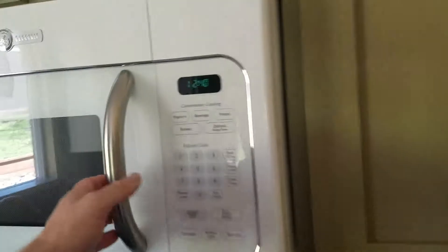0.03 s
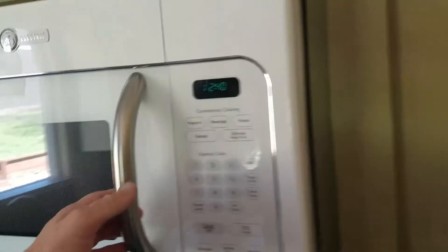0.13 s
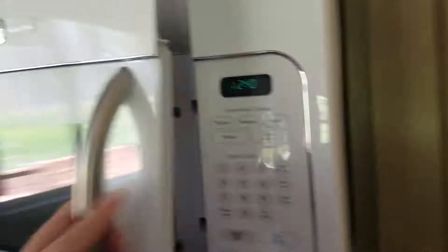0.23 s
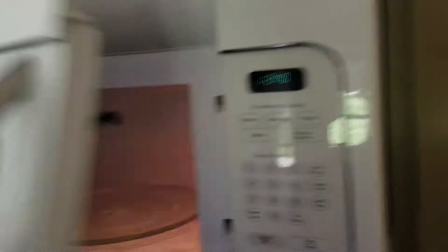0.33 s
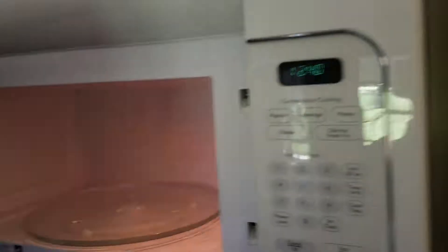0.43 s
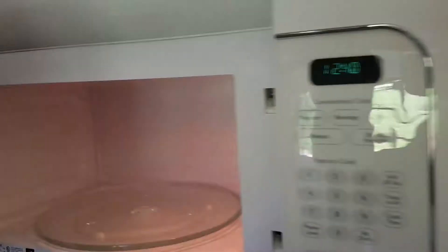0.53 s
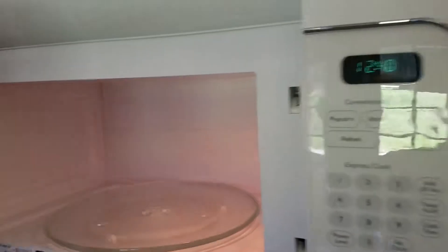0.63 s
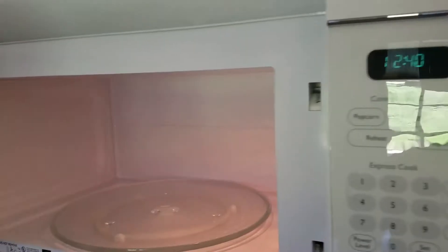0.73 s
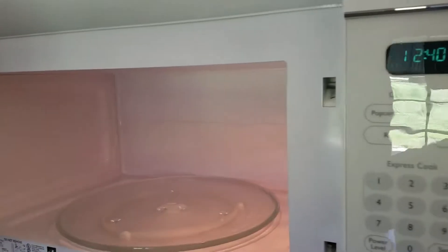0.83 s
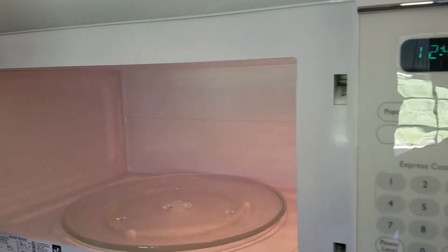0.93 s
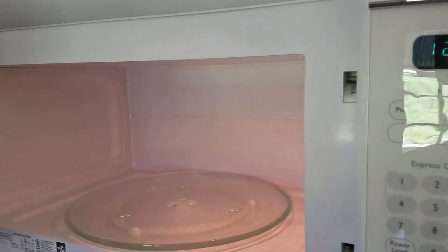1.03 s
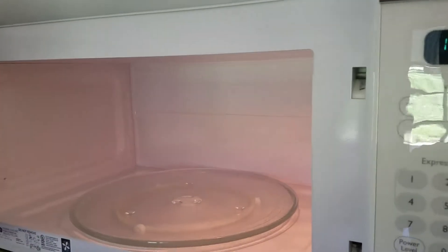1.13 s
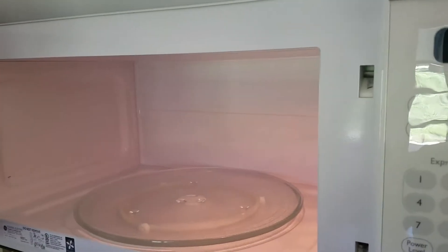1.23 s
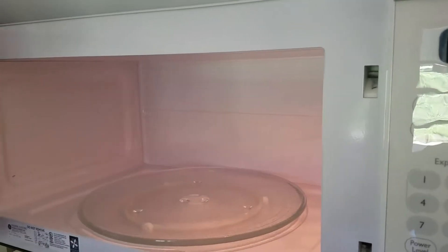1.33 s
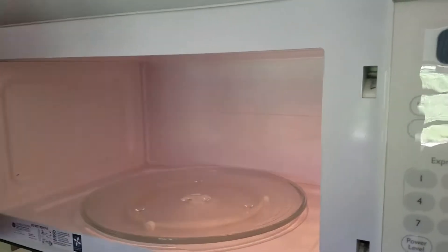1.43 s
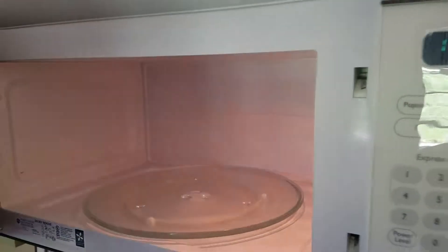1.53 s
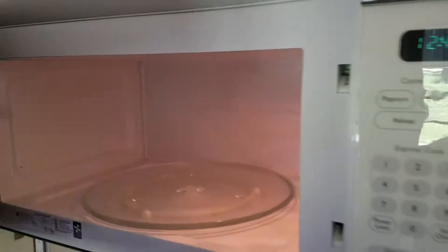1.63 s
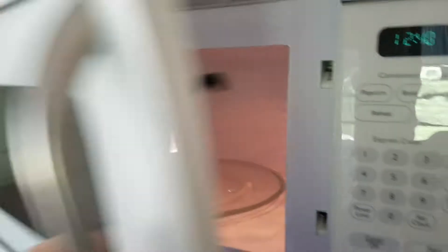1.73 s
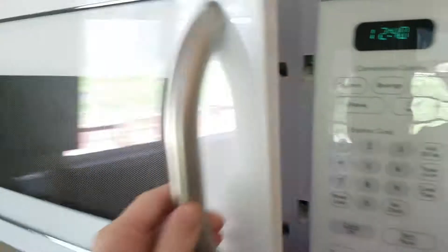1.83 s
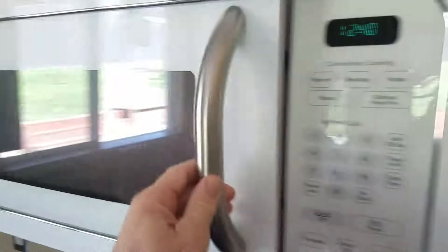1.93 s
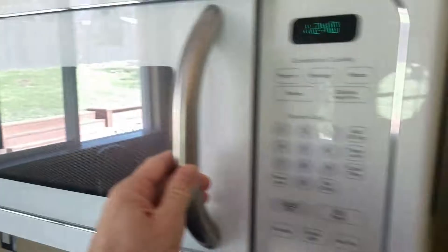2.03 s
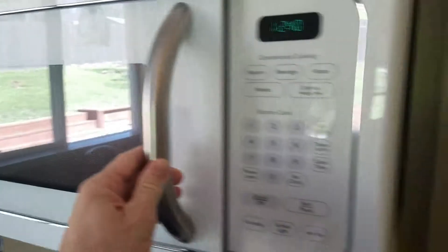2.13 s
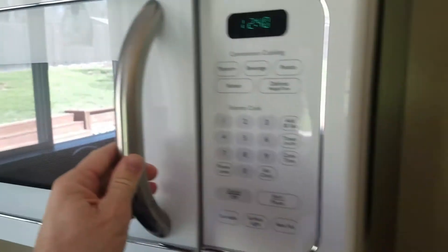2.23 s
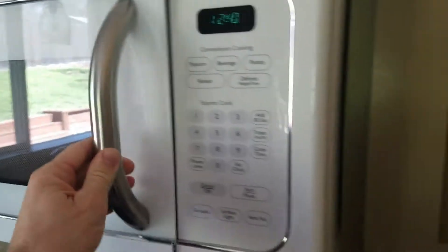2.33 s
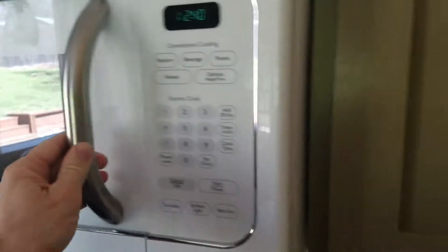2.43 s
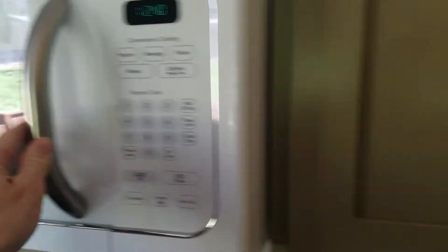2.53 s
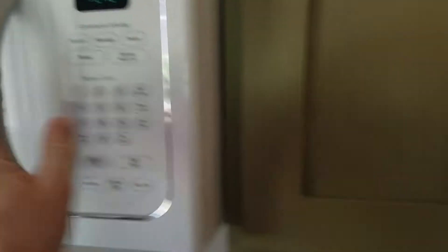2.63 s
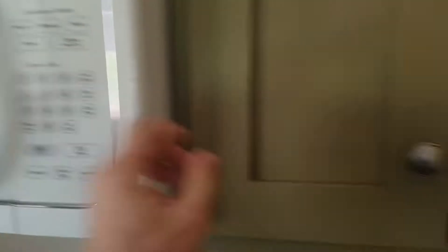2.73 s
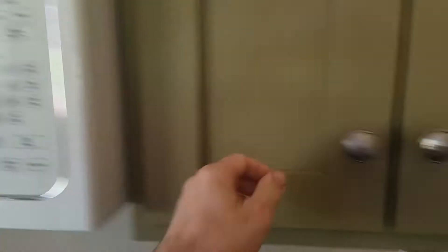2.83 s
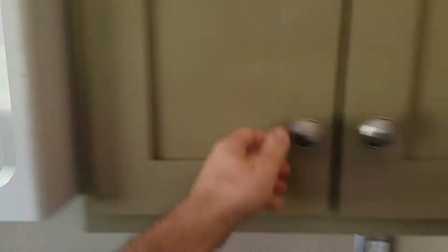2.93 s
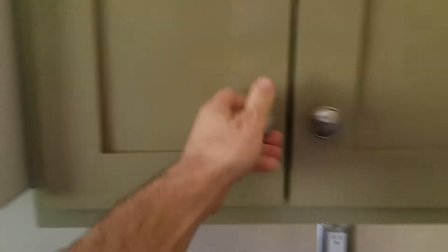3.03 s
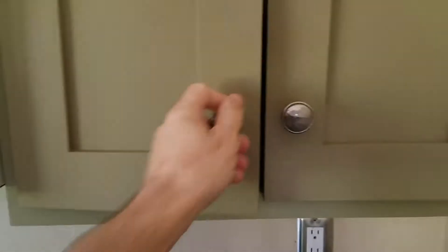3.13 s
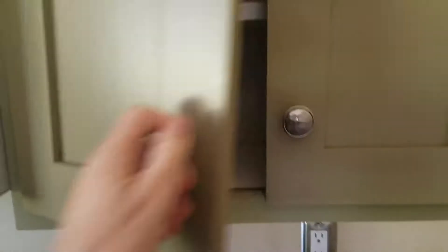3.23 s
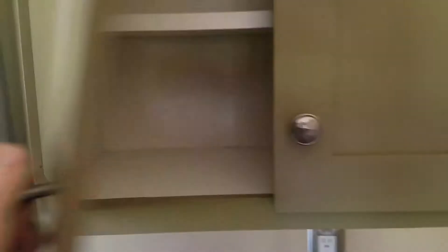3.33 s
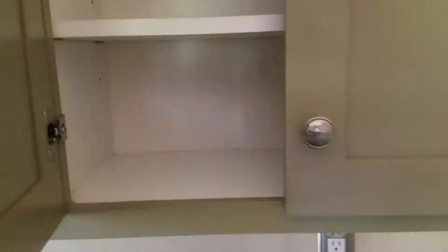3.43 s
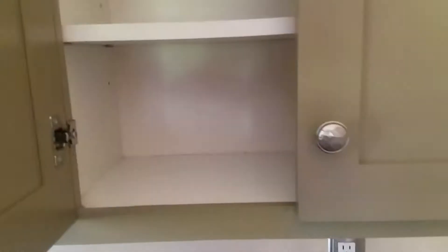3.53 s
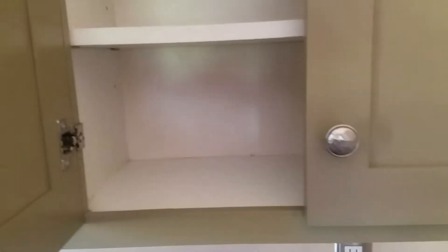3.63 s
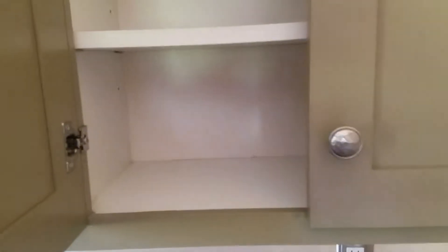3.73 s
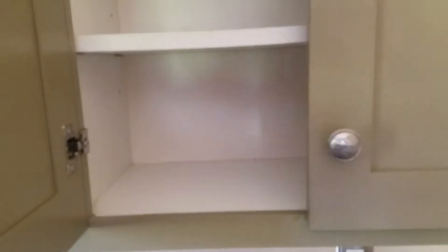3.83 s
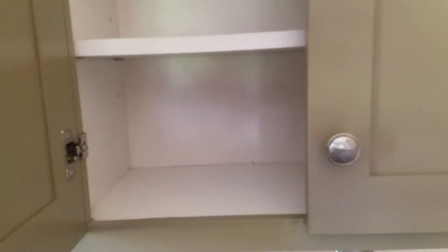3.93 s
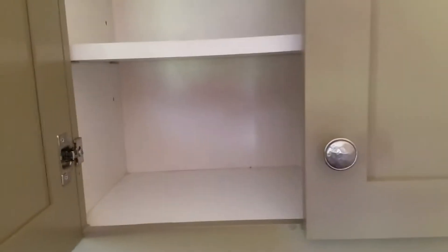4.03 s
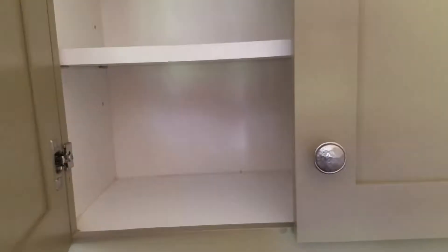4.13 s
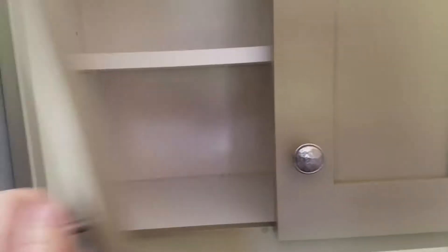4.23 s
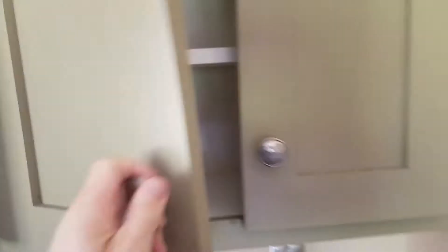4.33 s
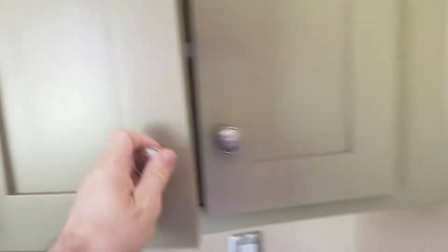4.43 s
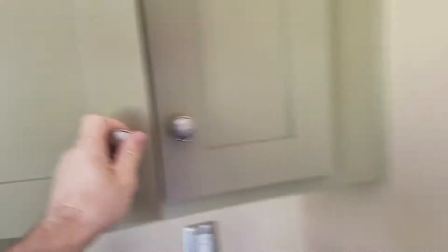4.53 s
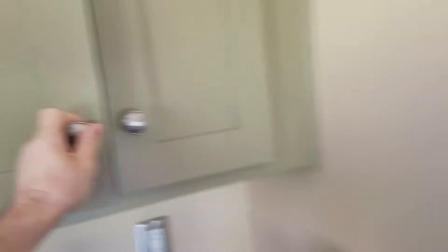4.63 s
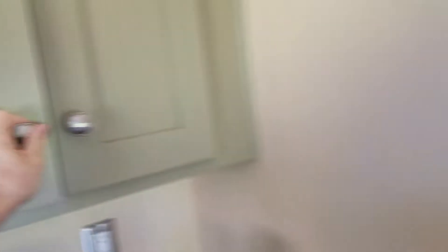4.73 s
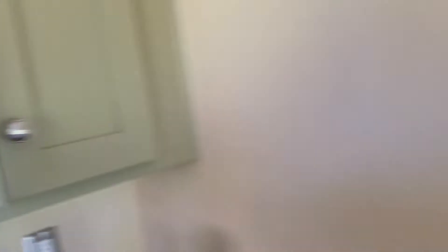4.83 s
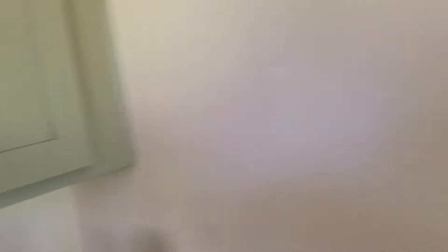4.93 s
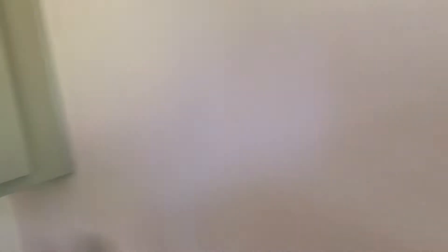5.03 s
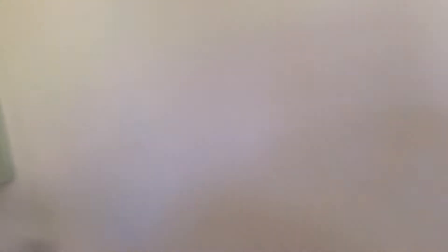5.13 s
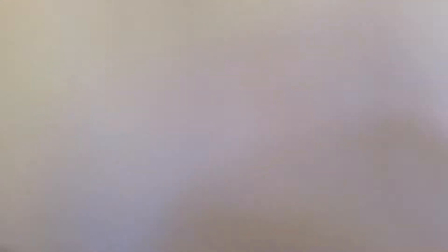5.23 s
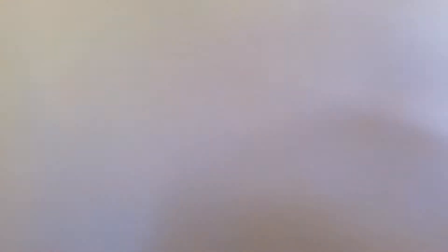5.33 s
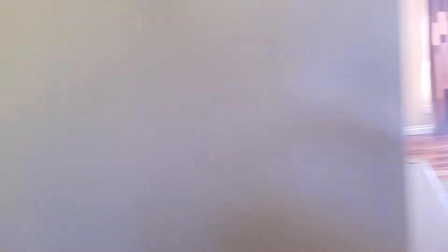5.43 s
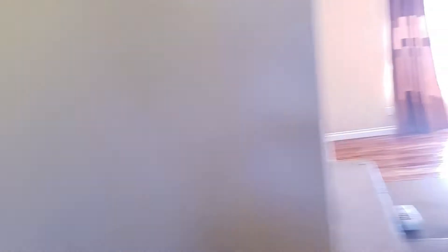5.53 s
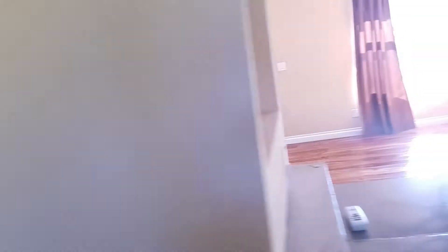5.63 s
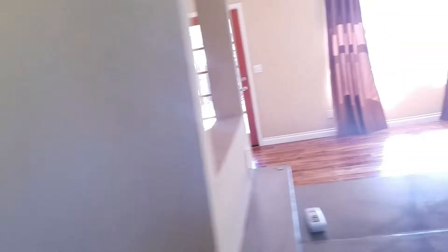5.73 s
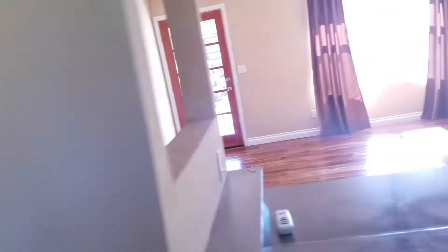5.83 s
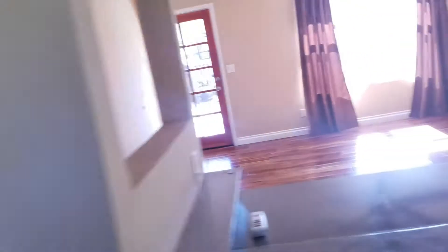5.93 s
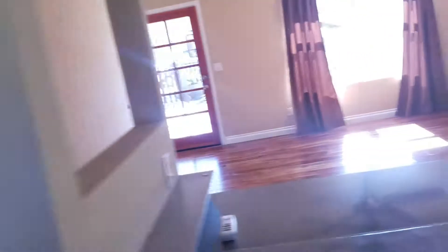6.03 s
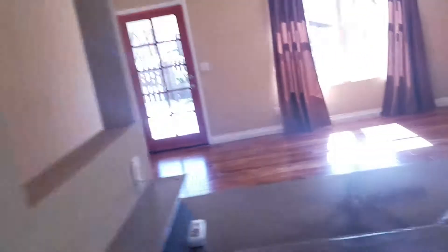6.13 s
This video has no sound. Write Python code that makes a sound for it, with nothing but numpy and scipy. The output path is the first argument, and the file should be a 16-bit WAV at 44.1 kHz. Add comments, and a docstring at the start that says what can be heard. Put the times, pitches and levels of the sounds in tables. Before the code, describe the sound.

A microwave door snaps open and slams shut, then a wooden cabinet door squeaks open and bangs closed in an echoing kitchen.

```python
"""A microwave door is pulled open with a snap and a humming spring, then pushed back until it latches.
A wooden cabinet door is opened, swung back and let go: it bangs and bounces to rest. Last comes one
hollow knock. Each blow is a short crack plus fading tones; rubbing is a fast run of tiny slips.
The bare kitchen of an empty house rings after every blow, heard by two microphones close by."""
import sys
import numpy as np
from scipy import signal
from scipy.fft import rfft, irfft, next_fast_len
from scipy.io import wavfile
from scipy.ndimage import uniform_filter1d

SR = 44100
rng = np.random.default_rng(int(sys.argv[2]) if len(sys.argv) > 2 else 0)


def log_audio(samples):
    """Write samples as a 16-bit WAV file to the path given in sys.argv[1]."""
    # one column per channel
    frames = np.atleast_2d(samples).T
    # limit to full scale, then quantise
    limited = np.clip(frames, -1, 1)
    pcm = np.round(limited * 32767).astype(np.int16)
    wavfile.write(sys.argv[1], SR, pcm)


N = 272484
BAND_HZ = np.geomspace(40, 16000, 18)


def amp(db):
    """Turns decibels into a gain."""
    return 10 ** (np.asarray(db) / 20)


def unit_power(x):
    """Scales a sound to an average power of 1."""
    return x / np.sqrt(np.mean(x ** 2) + 1e-20)


def read(points, hz):
    """A table's value at the frequency hz."""
    f, value = np.transpose(points)
    return np.interp(np.log(hz + 1), np.log(f + 1), value)


def add(mix, s, sound):
    """Mixes a sound in, starting at s seconds."""
    part = mix[:, round(s * SR):][:, :sound.shape[-1]]
    part += sound[..., :part.shape[1]]


def tinted(x, colour):
    """Filters a sound by a colour: a table of how strong each frequency is."""
    size = next_fast_len(x.shape[-1] + 4096)
    gain = amp(read(colour, np.fft.rfftfreq(size, 1 / SR)))
    return irfft(rfft(x, size) * gain, size)[..., :x.shape[-1]]


# how alike left and right are (frequency [Hz], likeness [0 to 1])
LIKENESS = [(100, 0.96), (300, 0.9), (550, .8), (900, 0.41), (1400, 0), (16000, 0)]
def stereo_noise(size):
    """White noise at two close microphones: alike in the bass, unrelated in the treble."""
    common, apart = rfft(rng.standard_normal((2, size)))
    angle = np.arccos(np.clip(read(LIKENESS, np.fft.rfftfreq(size, 1 / SR)), -1, 1)) / 2
    return irfft(np.array([common * np.cos(angle) + side * apart * np.sin(angle) for side in (1, -1)]), size)


def in_bands(x):
    """Splits a stereo sound into bands, low to high: bands x channels x samples."""
    hz = np.fft.rfftfreq(x.shape[-1], 1 / SR)
    shares = np.array([read(np.c_[BAND_HZ, one], hz) for one in np.eye(len(BAND_HZ))])
    return irfft(rfft(x) * shares[:, None], x.shape[-1])


def ringing(tones, t):
    """Pure tones, each fading by 60 dB over its ring time, t60."""
    return sum((-1) ** k * amp(db - 60 * t / t60) * np.sin(2 * np.pi * hz * t)
               for k, (hz, db, t60) in enumerate(tones))


def hardness(hz, bass_db, treble_db):
    """Gain of a blow at hz: a heavy push feeds the bass, a hard edge the treble."""
    return amp(bass_db / (1 + (hz / 480) ** 3) + treble_db / (1 + (3200 / hz) ** 2))


def struck(blows, colour, ring, crack_db, tones=(), tones_db=0, size=18000):
    """Each blow cracks, then rings a crowd of short tones (made of noise) and any strong ones given."""
    t, hz, out = np.arange(size) / SR, BAND_HZ[:, None], np.zeros((2, N))
    crowd = in_bands(unit_power(tinted(stereo_noise(3 * size), colour)))
    power = np.mean(crowd ** 2, axis=1)
    rise = 1 - np.exp(-t * hz * 2)  # low tones take longer to get going
    decay = rise * (amp(-60 * t / read(ring, hz)) + amp(crack_db) * np.exp(-t / 0.0063))
    weight = decay ** 2 / np.sum(decay ** 2, axis=1, keepdims=True)
    for s, db, bass_db, treble_db in blows:
        start = rng.integers(2 * size)
        part = slice(start, start + size)
        # each band takes its share of the energy
        share = np.sqrt(power.mean(1) / np.sum(power[:, part] * weight, axis=1))
        envelope = decay * share[:, None] * hardness(hz, bass_db, treble_db)
        blow = np.einsum("bct,bt->ct", crowd[..., part], envelope)
        for tone in tones:
            way = rng.choice([-1, 1])  # the spot that is hit decides which way a tone starts
            blow += amp(tones_db) * hardness(tone[0], bass_db, treble_db) * way * ringing([tone], t)
        add(out, s, amp(db) * blow)
    return out


def rubbing(stroke, colour, slips_per_s, spread_db):
    """Tiny slips of uneven size, following a stroke of (time [s], level [dB]) points."""
    s, db = np.transpose(stroke)
    size, out = 3 * SR, np.zeros((2, N))
    slipping = rng.random(size) < slips_per_s / SR
    slips = slipping * amp(spread_db * np.minimum(rng.exponential(1, size), 4))
    t = np.arange(s[0], s[-1], 1 / SR)
    grain = unit_power(tinted((stereo_noise(size) * slips)[:, :len(t)], colour))
    add(out, s[0], grain * amp(np.interp(t, s, db)))
    return out


def swells(peaks, colour, rise_s, fall_s, slips_per_s, spread_db):
    """Rubbing that swells to each peak and dies away."""
    strokes = [[(max(s - rise_s, 0), db - 18.5), (s, db), (s + fall_s, db - 22.5)] for s, db in peaks]
    return sum(rubbing(stroke, colour, slips_per_s, spread_db) for stroke in strokes)


# colour of the background hush (frequency [Hz], level [dB])
AIR_COLOUR = [(25, -15), (50, -5), (65, 3.5), (100, -4), (130, 2.5), (170, -7), (245, 1), (330, -8.5),
              (420, -4.5), (800, -10.5), (2000, -12.5), (4000, -20.5), (8000, -28.5), (13500, -19.5),
              (15800, -25)]
def air(level_db=-65.5):
    """A faint, steady rumble and hiss."""
    return amp(level_db) * unit_power(tinted(stereo_noise(N), AIR_COLOUR))


# how long the echo lasts (frequency [Hz], ring time [s])
ROOM_RING = [(80, 0.71), (300, 0.8), (600, 0.69), (1300, 1), (2700, 0.95), (5000, 0.88), (8000, .45),
             (15000, 0.93)]
# the echo compared with the direct sound (frequency [Hz], level [dB])
ROOM_LEVEL = [(80, -11.5), (300, -6), (700, -3), (1400, -3.5), (3000, -7), (6000, -6), (9000, -9.5),
              (15000, -14)]
def room(x, size=60000):
    """Bare walls throw back a dense echo that builds up quickly and fades in about a second."""
    t = np.arange(size) / SR
    decay = amp(-60 * t / read(ROOM_RING, BAND_HZ[:, None]))
    build_up = 1 - np.exp(-t / 0.0016)
    spectrum = rfft(np.einsum("bct,bt->ct", in_bands(stereo_noise(size)), decay) * build_up)
    spectrum /= np.sqrt(uniform_filter1d(abs(spectrum) ** 2, size=60, axis=1))  # share energy evenly
    tail = tinted(irfft(spectrum, size), ROOM_LEVEL) * np.minimum(1, 10 * (t[-1] - t))
    return signal.fftconvolve(x, tail, axes=1)[:, :N]


# drags of the hand (peak time [s], level [dB])
HAND_STROKES = [(3.0, -43.5), (3.11, -41), (3.36, -48), (4.16, -52), (4.62, -56), (4.95, -61.5)]
# colour of their rumble (frequency [Hz], level [dB])
HAND_COLOUR = [(40, -16), (75, -1.5), (140, 1), (270, -3.5), (420, -16.5), (620, -23.5), (900, -26),
               (2500, -34.5), (7000, -48.5), (15000, -44)]
def hand():
    """Skin dragging on the knob makes the door panel rumble, alike at both microphones."""
    return swells(HAND_STROKES, HAND_COLOUR, rise_s=.055, fall_s=.22, slips_per_s=6200, spread_db=3)[0]


def fumbles(count=6, start_s=4.38, end_s=5.0, db=-46, spread_db=9, cutoff_hz=115):
    """Faint bumps at loose intervals."""
    gap = (end_s - start_s) / count
    return [(start_s + (k + late) * gap, db + spread_db * (2 * force - 1), cutoff_hz)
            for k, (late, force) in enumerate(rng.random((count, 2)))]


# soft bumps of hand and doors (time [s], strength [dB], treble cutoff [Hz])
BUMPS = [(.01, -45, 90), (2.077, -21.5, 125), (2.988, -42, 155), (3.069, -30, 111), (3.087, -28.5, 310),
         (3.345, -34.5, 181), (3.425, -38, 84), (4.18, -45.5, 220.6)]
# a panel's low tones (frequency [Hz], level [dB], ring time [s])
BUMP_TONES = [(68.3, -1.5, 0.099), (101.3, 1.5, 0.095), (152.1, 9.5, 0.036), (241, -3.5, 0.2),
              (300, 2.5, 0.047)]
def bumps():
    """Soft contacts wake only the lowest tones of a panel, a little differently at each spot."""
    t, out = np.arange(SR // 3) / SR, np.zeros((2, N))
    for s, db, cutoff_hz in BUMPS + fumbles():
        tones = [(hz * (1 + 0.06 * rng.uniform(-1.1, 1)),
                  level - 10 * np.log10(1 + (hz / cutoff_hz) ** 6), t60) for hz, level, t60 in BUMP_TONES]
        add(out, s, amp(db) * ringing(tones, t) * (1 - np.exp(-t / 0.0032)))
    return out


# hinge noises (peak time [s], level [dB])
SQUEAKS = [(1.14, -64.5)]
SQUEALS = [(3.27, -58.5), (3.45, -63)]
RASPS = [(4.33, -55), (4.46, -59), (4.65, -57)]
# their colours (frequency [Hz], level [dB])
SQUEAK_COLOUR = [(1600, -31), (2000, -2.5), (2350, 1), (3000, -26)]
SQUEAL_COLOUR = [(500, 9), (2200, 6), (3600, -5), (4900, 1.5), (5800, -9), (8500, -20), (10600, -11),
                 (11200, -7), (12000, -11), (15500, -40)]
RASP_COLOUR = [(200, -2), (900, -0.5), (2500, -3), (5000, -13.5), (8000, -16.5), (15000, -16)]
def hinges():
    """The microwave's hinge squeaks once; the cabinet's squeal as it opens and rasp as it swings back."""
    squeak = swells(SQUEAKS, SQUEAK_COLOUR, rise_s=.02, fall_s=.05, slips_per_s=3000, spread_db=1)
    squeal = swells(SQUEALS, SQUEAL_COLOUR, rise_s=.12, fall_s=.22, slips_per_s=3200, spread_db=2)
    rasp = swells(RASPS, RASP_COLOUR, rise_s=.11, fall_s=.2, slips_per_s=6600, spread_db=-2.5)
    return squeak + squeal + rasp


# small ticks (time [s], strength [dB])
TICKS = [(1.876, -45.5), (1.945, -57), (2.001, -38.5), (2.418, -28), (3.087, -44), (5.23, -46)]
# their colour (frequency [Hz], level [dB])
TICK_COLOUR = [(300, -13.5), (2700, -8), (3600, 2.5), (4500, -7), (5400, -4), (7000, -8.5), (11000, -8.5),
               (15500, -1)]
# their fade (frequency [Hz], ring time [s])
TICK_RING = [(3000, 0.2), (15000, 0.065)]
def ticks():
    """Short, bright ticks of treble, most of them faint."""
    return struck([(s, db, 0, 0) for s, db in TICKS], TICK_COLOUR, TICK_RING, crack_db=-6, size=6000)


# the latch's scrape (time [s], level [dB])
LATCH_SLIDE = [(2.1, -51), (2.17, -50), (2.26, -41.5), (2.295, -54), (2.32, -41.5), (2.375, -34),
               (2.39, -61)]
# its colour (frequency [Hz], level [dB])
LATCH_COLOUR = [(150, -14), (400, -14.5), (1300, -18), (2200, -18), (3200, -32.5), (5000, -40.5),
                (8000, -50.5), (15000, -51.5)]
def latch_slide():
    """The latch hooks rub up their ramps as the microwave closes."""
    return rubbing(LATCH_SLIDE, LATCH_COLOUR, slips_per_s=4900, spread_db=-5.5)


# the door spring's low and high tones (frequency [Hz], level [dB], ring time [s])
SPRING_TONES = [(232, -32, 1.1), (335.8, -43.5, 4.5), (348, -26, .3)]
SPRING_OVERTONES = [(671.5, -33, 1.1), (1229, -32, .6)]
def spring(freed_s=.176, snap_s=.232, held_s=1.75, damping_db_per_s=45):
    """Plucked and jarred by the latch, the spring hums, then dies faster once the hand takes the door."""
    t, out = np.arange(3 * SR) / SR, np.zeros((2, N))
    damping = amp(-damping_db_per_s * np.maximum(t + freed_s - held_s, 0))
    add(out, freed_s, ringing(SPRING_TONES, t) * damping)
    add(out, snap_s, ringing(SPRING_OVERTONES, t))
    return out


# the knock and its rebound (time [s], strength [dB], extra bass [dB], extra treble [dB])
KNOCKS = [(6.0488, -31.5, 8.5, -8.5), (6.0543, -29.5, -1.5, 7)]
# its colour (frequency [Hz], level [dB])
KNOCK_COLOUR = [(100, -36.5), (240, -5), (400, 12), (600, 5), (900, 1), (1300, -6.5), (2300, -11),
                (4000, -24.5), (7000, -41), (15000, -47)]
# its fade (frequency [Hz], ring time [s])
KNOCK_RING = [(300, 0.097), (900, 0.094), (5000, 0.27)]
# its strong tones (frequency [Hz], level [dB], ring time [s])
KNOCK_TONES = [(590, 1, .03), (720, -2, .025), (870, 1, .022)]
def hollow_knock():
    """A knock on something too small to give bass."""
    knock = struck(KNOCKS, KNOCK_COLOUR, KNOCK_RING, crack_db=-25,
                   tones=KNOCK_TONES, tones_db=-1, size=6000)
    return signal.sosfilt(signal.butter(2, 190, "high", fs=SR, output="sos"), knock)


def bounces(bang_s, count=7, flight_s=.117, flight_kept=.78):
    """Each flight of the cabinet door is shorter than the last, each landing weaker and duller."""
    times = bang_s + np.cumsum(flight_s * flight_kept ** np.arange(count))
    # (strength [dB], extra bass [dB], extra treble [dB])
    first, step = np.array([-23.5, 1.8, -5]), np.array([-3.5, 0.42, -1.5])
    return [(s, *(first + k * step)) for k, s in enumerate(times)]


# a jolt on the hinge, then a soft and a hard hit on the frame
# (time [s], strength [dB], extra bass [dB], extra treble [dB])
CABINET_BLOWS = [(4.584, -45.5, -14.5, -32), (5.100, -25, 13, -20.5), (5.110, -18, 0.5, 7)]
# the wood's colour (frequency [Hz], level [dB])
CABINET_COLOUR = [(35, -35), (80, 6), (115, -5), (170, 3), (300, 3), (400, 9), (520, -1), (1200, -2),
                  (2000, -9), (3800, -22.5), (7500, -32.5), (10000, -28.5), (15500, -42)]
# its fade (frequency [Hz], ring time [s])
CABINET_RING = [(100, 0.43), (400, 0.23), (1300, 0.22), (4000, 0.5), (12000, 0.14)]
# its strong tones (frequency [Hz], level [dB], ring time [s])
CABINET_TONES = [(87.7, -6.5, 0.72), (154.6, -0.5, 0.61), (222.5, 1, 0.35), (260, -15.5, 0.36),
                 (326.4, 0, 0.38), (353, -2.5, 0.82), (384, 6.5, 0.27), (441, -24, 0.2), (650, -11, 0.26),
                 (1102, -4, 0.28)]
def cabinet():
    """The wooden door bangs on its frame and bounces to rest."""
    blows = CABINET_BLOWS + bounces(bang_s=CABINET_BLOWS[-1][0])
    return struck(blows, CABINET_COLOUR, CABINET_RING, crack_db=-9.5, tones=CABINET_TONES, tones_db=-12.5)


def latch_strain(count=6, start_s=.14, end_s=.2, start_db=-47, end_db=-32.5, bass_db=5.5, treble_db=6):
    """Under the pull, the latch slips in ever stronger jerks."""
    times, levels = np.linspace(start_s, end_s, count), np.linspace(start_db, end_db, count)
    return [(s, db, bass_db, treble_db) for s, db in zip(times, levels)]


# first thud of each shudder (time [s], strength [dB])
SHUDDERS = [(.255, -26.5), (2.035, -27.5), (2.429, -12.5)]
def shudders(count=3, gap_s=.045, loss_db=7, bass_db=4, bass_step_db=1, treble_db=-15):
    """After a heavy blow the microwave rocks, each thud weaker and deeper than the last."""
    return [(s + k * gap_s, db - k * loss_db, bass_db + k * bass_step_db, treble_db)
            for s, db in SHUDDERS for k in range(count)]


# latch and door hitting the case (time [s], strength [dB], extra bass [dB], extra treble [dB])
MICROWAVE_BLOWS = [(.165, -35.5, -1, 13.5), (.214, -26.5, -2.5, 11.5), (.232, -12, -13.5, -3),
                   (.246, -17, -15.5, -6.5), (2.002, -25, -0.5, -6.5), (2.384, -19.5, 0.5, 4),
                   (2.415, -12.5, 5.5, -2)]
# light clicks of the swinging door (time [s], strength [dB], extra treble [dB])
DOOR_CLICKS = [(1.363, -52.5, -36), (1.594, -49.5, -13.5), (1.778, -54, 6), (1.823, -59, 4.5),
               (1.877, -51.5, -2), (1.943, -51.5, 4)]
# colours of the hooks and the case (frequency [Hz], level [dB])
HOOK_COLOUR = [(2500, -26), (3700, -1.5), (4300, 5), (4900, -3.5), (5700, -16.5), (9000, -27.5)]
CASE_COLOUR = [(35, -21), (75, 2.5), (160, -2), (350, 0.5), (520, -5), (1250, -3.5), (2100, -9),
               (3000, -16), (5500, -22), (7500, -29.5), (10500, -25.5), (15500, -35.5)]
# the case's fade (frequency [Hz], ring time [s])
CASE_RING = [(100, 0.31), (400, 0.25), (1300, 0.16), (4000, 0.2), (12000, 0.26)]
# its strong tones (frequency [Hz], level [dB], ring time [s])
CASE_TONES = [(66.6, -10.5, 0.51), (78, -7, 0.19), (95, -11.5, 0.57), (214.8, 2, 0.42), (294, -9.5, 0.5),
              (300, -1.5, 0.1), (370, -1.5, 0.32), (416, 2.5, 0.11), (578, -14.5, 0.69), (792, -12.5, 0.4)]
def microwave(click_bass_db=-5.5):
    """Latch hooks snap out of their slots; later they land with a ring, and the door slams shut."""
    hooks = struck([(2.003, -39.5, .0061, .005)], HOOK_COLOUR, [(3000, .25), (6000, .12)], crack_db=-7.5)
    clicks = [(s, db, click_bass_db, treble_db) for s, db, treble_db in DOOR_CLICKS]
    blows = MICROWAVE_BLOWS + shudders() + latch_strain() + clicks
    return hooks + struck(blows, CASE_COLOUR, CASE_RING, crack_db=-10.5, tones=CASE_TONES, tones_db=-14.5)


def scene():
    """Mixes all the sounds; all but the spring and the hush echo in the room."""
    doors = microwave() + cabinet() + hinges() + latch_slide()
    ticking = ticks()
    thuds = amp(-1) * bumps() + hand()
    knock = hollow_knock()
    hush = air()
    echo = room(doors + amp(-4) * ticking + amp(-3.5) * thuds + knock)
    return doors + ticking + thuds + knock + spring() + echo + hush


# balance of the microphones (frequency [Hz], left minus right [dB])
BALANCE = [(100, -2.5), (550, -2.5), (1000, -5.5), (4800, -5), (8000, -4.5), (15000, 3)]
def record(dry, ceiling=.95, low_hz=38, high_hz=16150):
    """The left microphone is mostly quieter; the deepest bass and highest treble are cut."""
    mics = np.array([tinted(x, [(hz, side * db / 2) for hz, db in BALANCE])
                     for x, side in zip(dry, (1, -1))])
    mics = signal.sosfilt(signal.butter(2, low_hz, "high", fs=SR, output="sos"), mics)
    mics /= (1 + (mics / ceiling) ** 4) ** .25  # rounds off the loudest peaks
    treble_cut = signal.firwin(511, high_hz, window=("kaiser", 9), fs=SR)
    return signal.oaconvolve(mics, treble_cut[None], "same")


dry = scene()
out = record(dry)
log_audio(out)
```